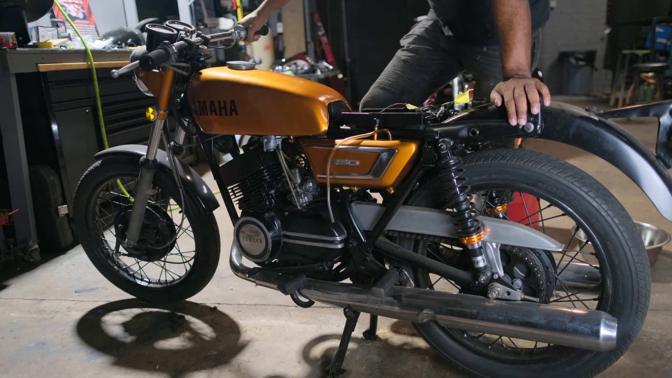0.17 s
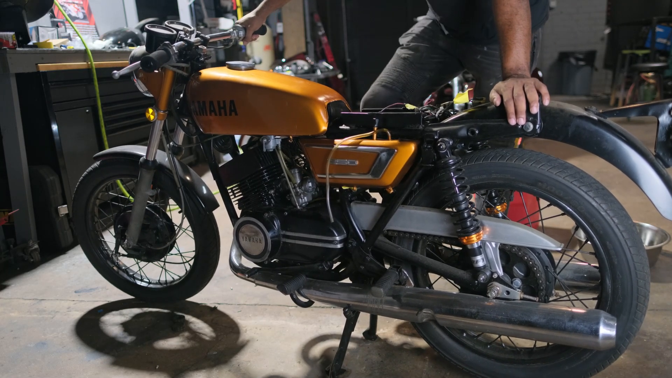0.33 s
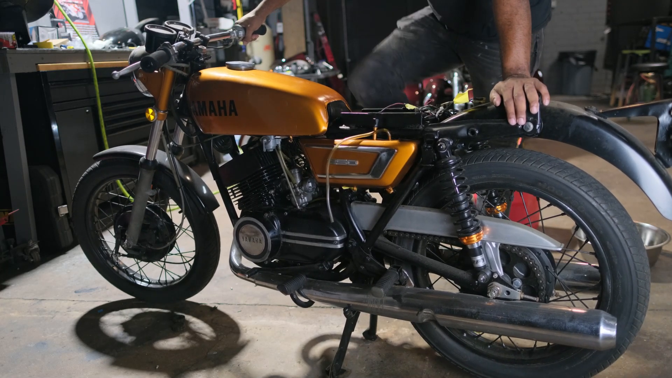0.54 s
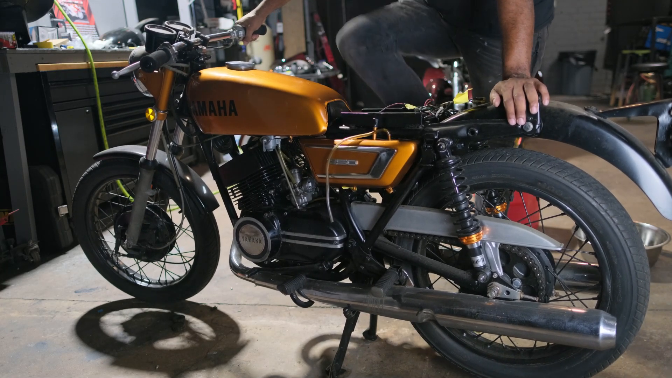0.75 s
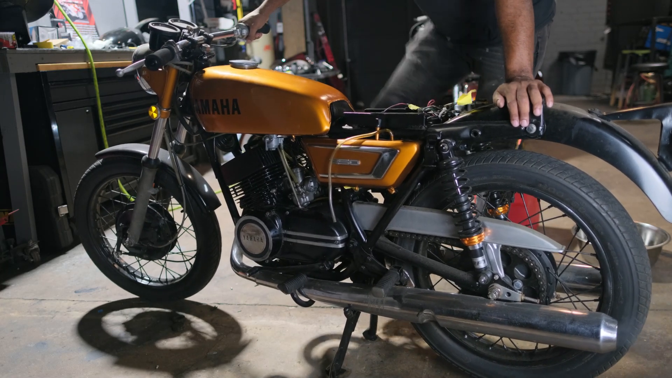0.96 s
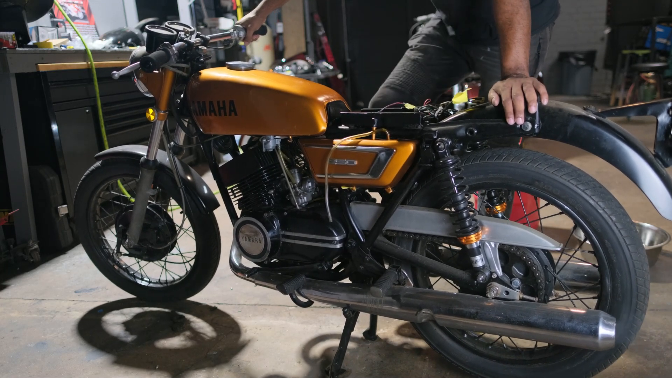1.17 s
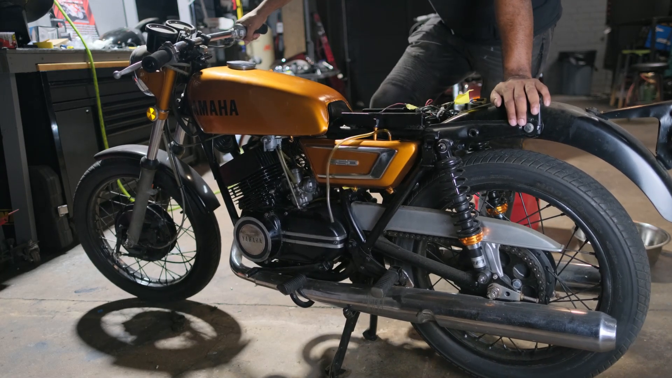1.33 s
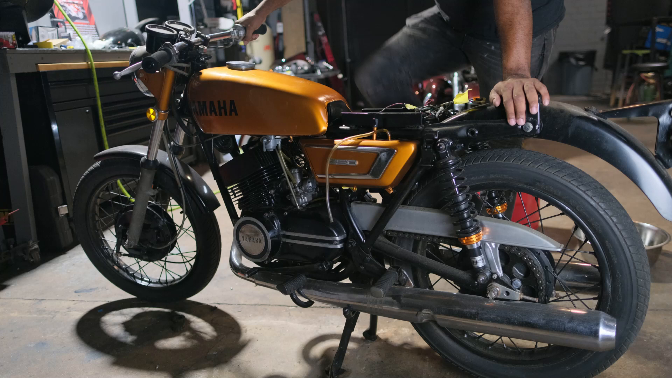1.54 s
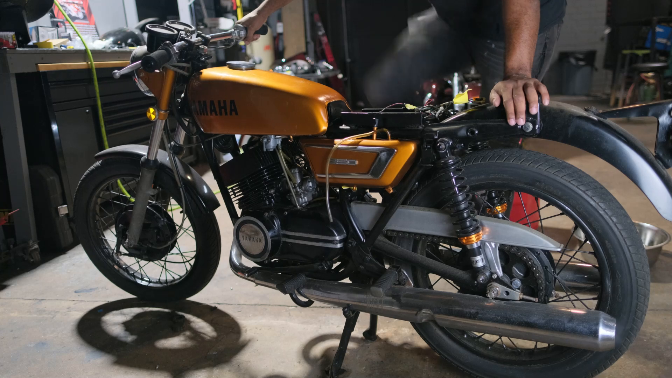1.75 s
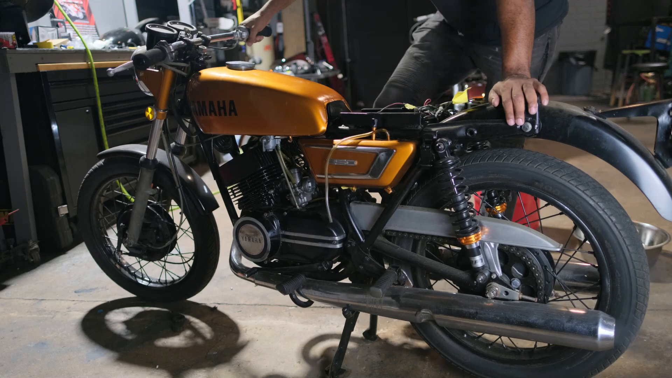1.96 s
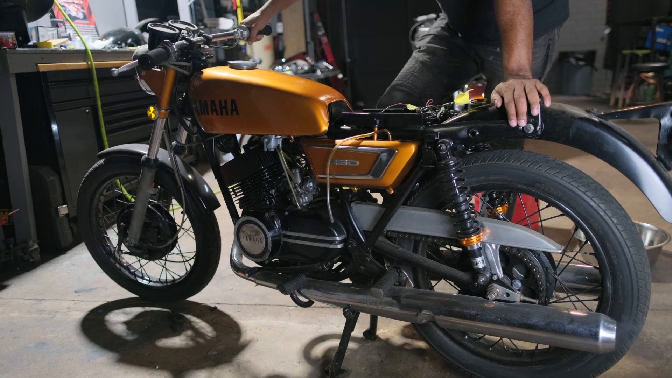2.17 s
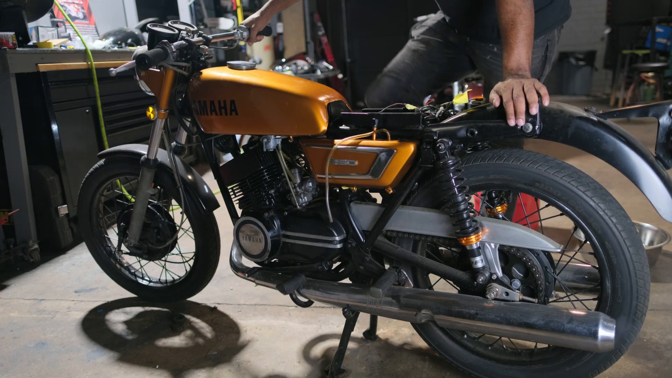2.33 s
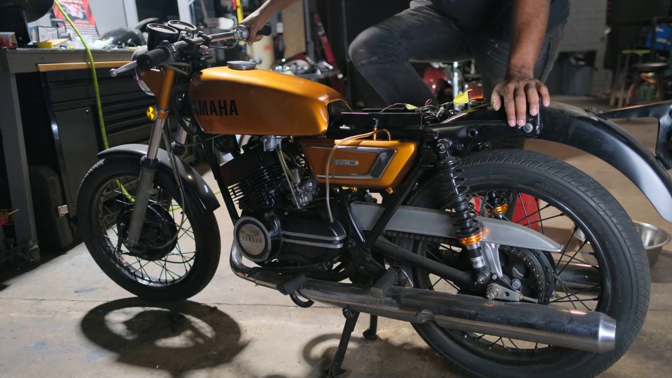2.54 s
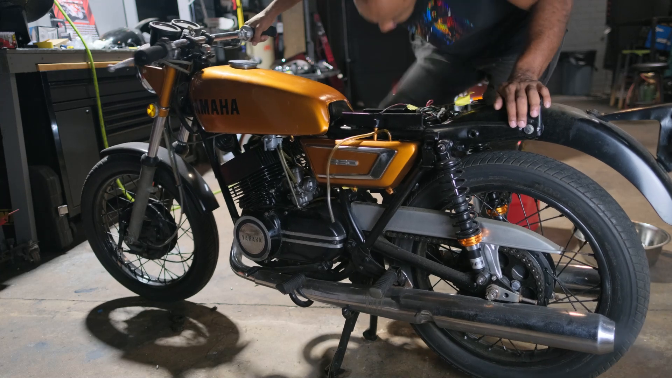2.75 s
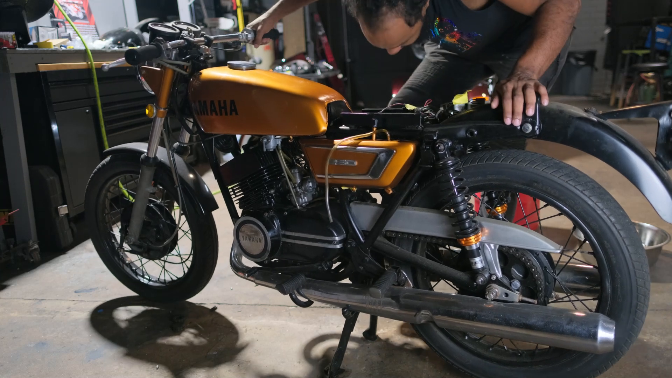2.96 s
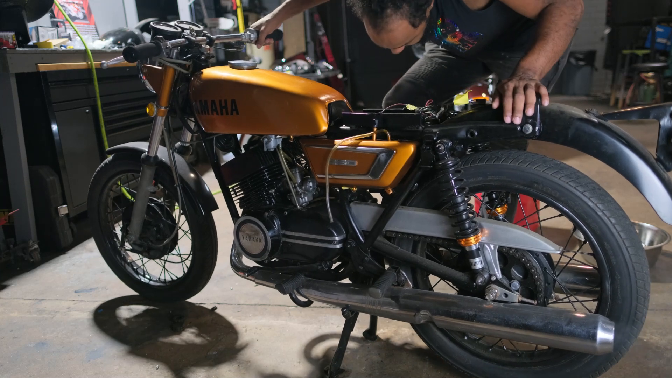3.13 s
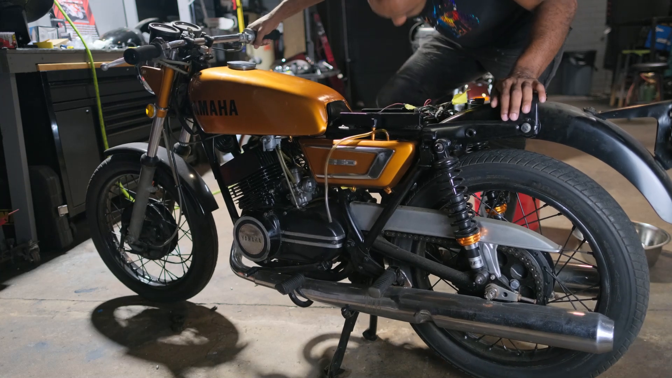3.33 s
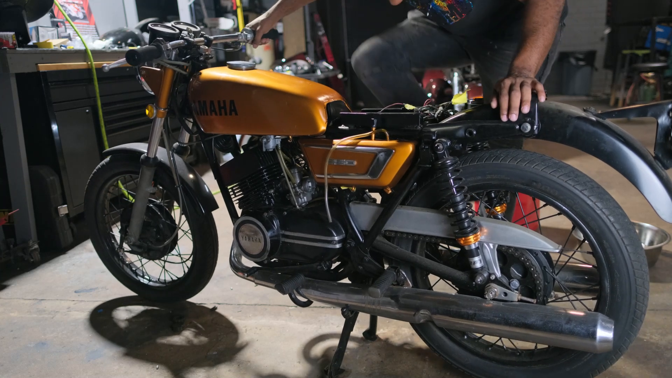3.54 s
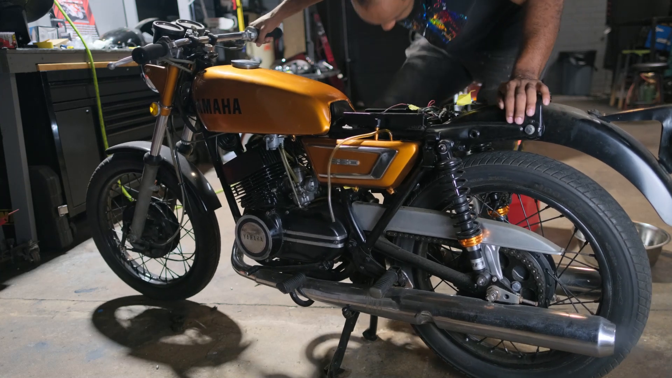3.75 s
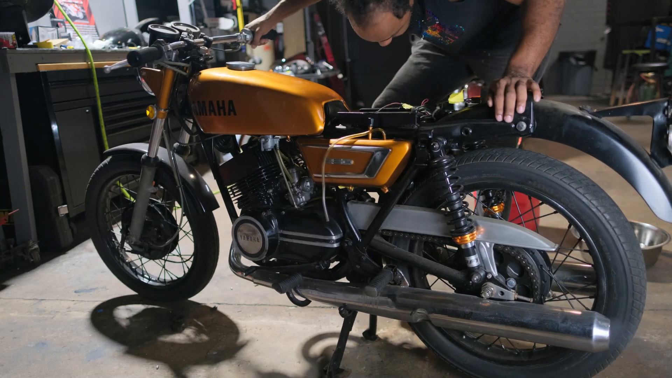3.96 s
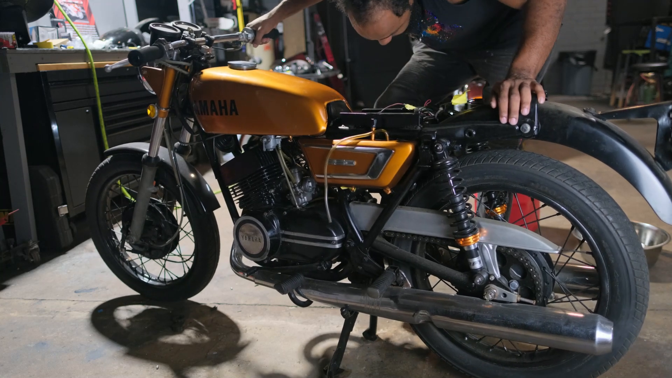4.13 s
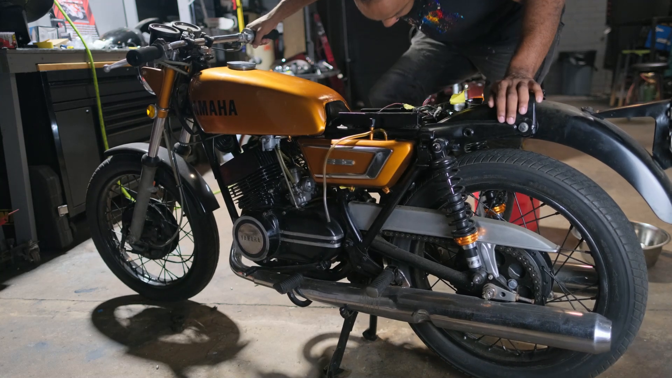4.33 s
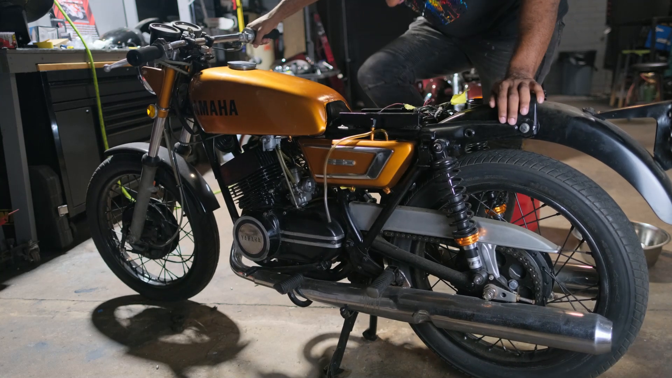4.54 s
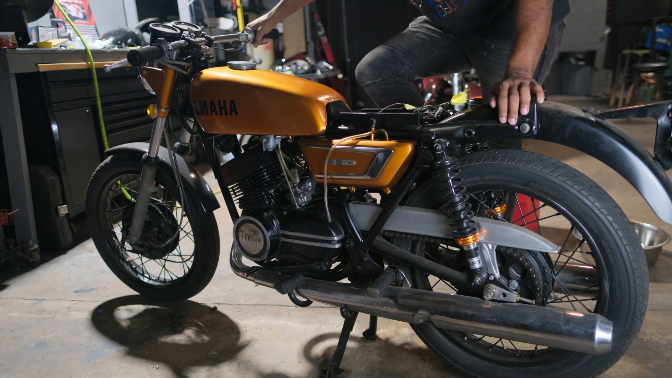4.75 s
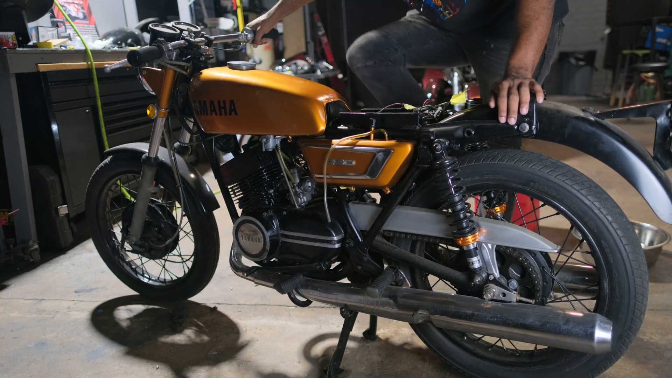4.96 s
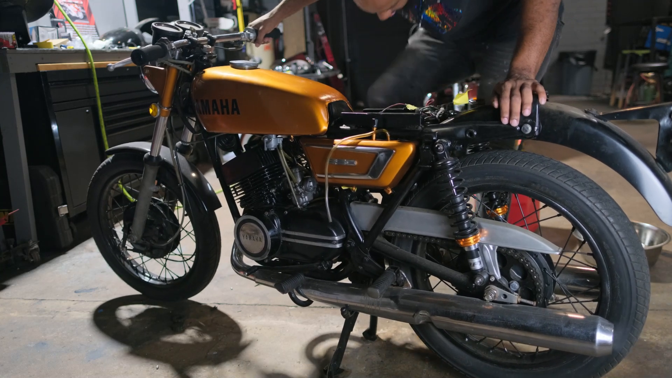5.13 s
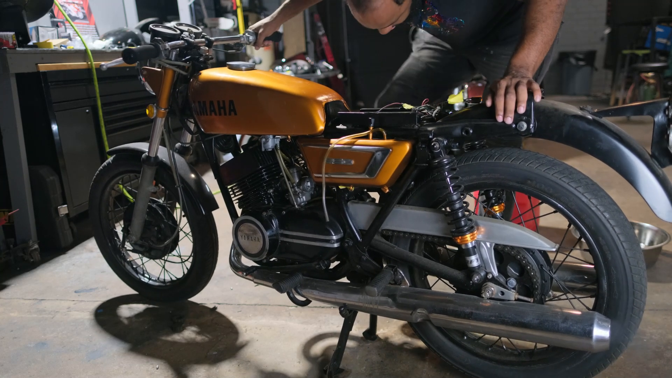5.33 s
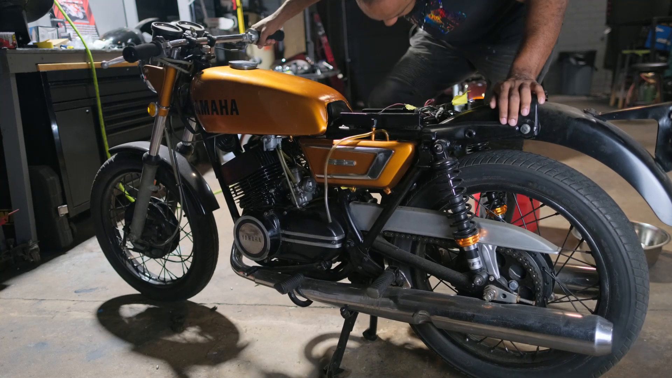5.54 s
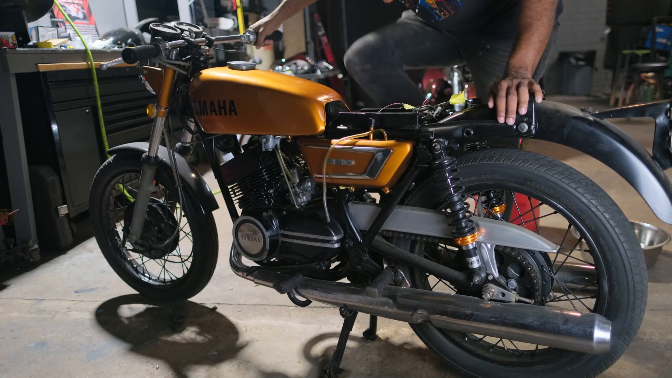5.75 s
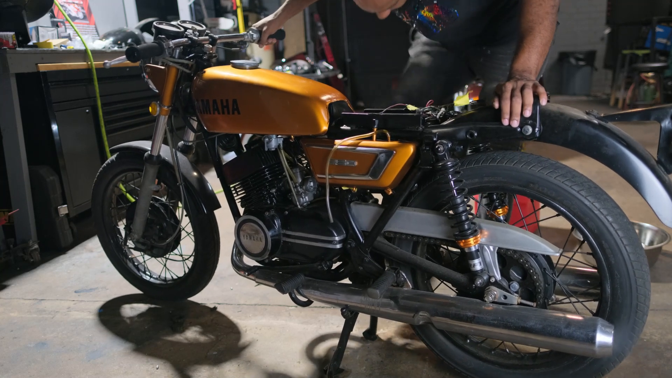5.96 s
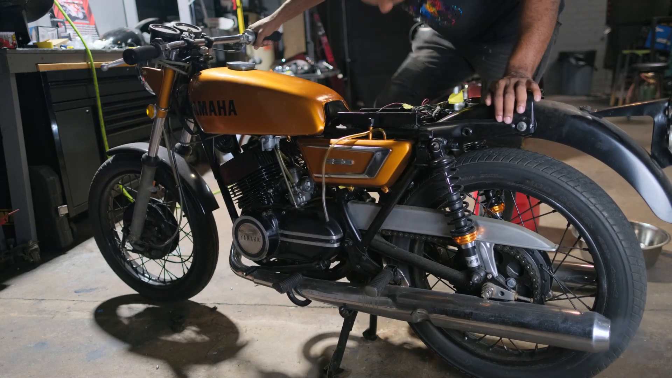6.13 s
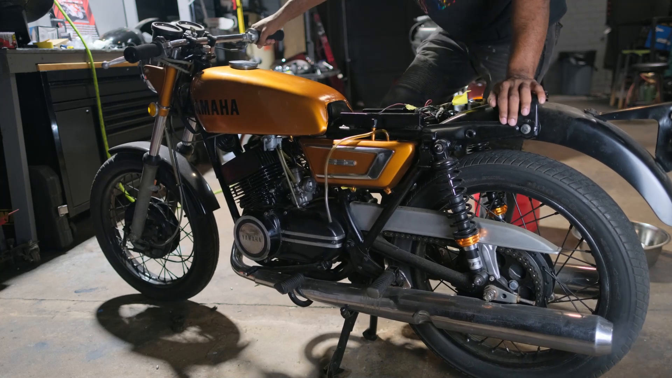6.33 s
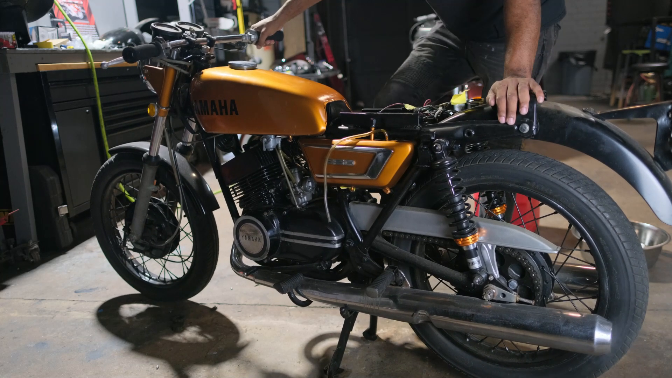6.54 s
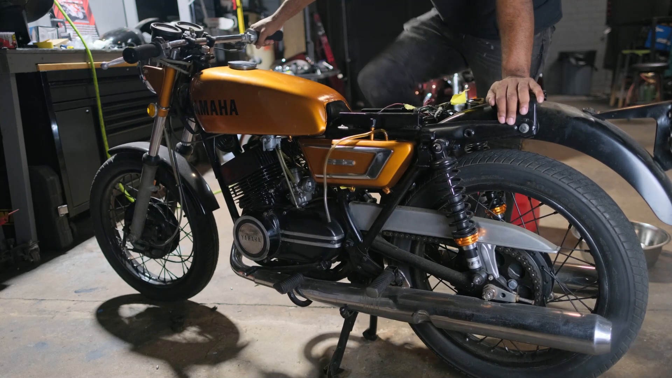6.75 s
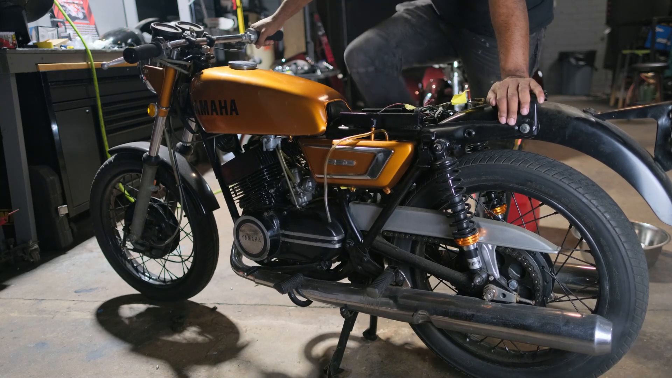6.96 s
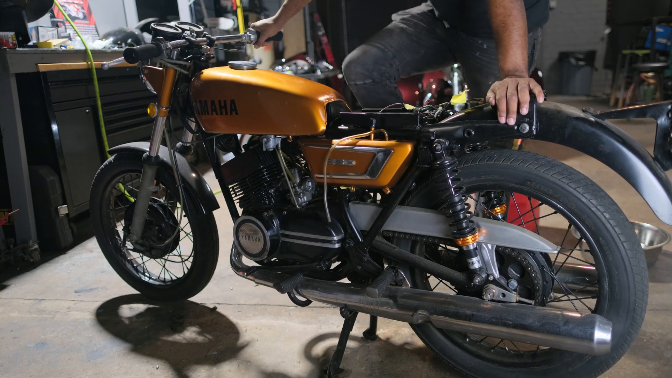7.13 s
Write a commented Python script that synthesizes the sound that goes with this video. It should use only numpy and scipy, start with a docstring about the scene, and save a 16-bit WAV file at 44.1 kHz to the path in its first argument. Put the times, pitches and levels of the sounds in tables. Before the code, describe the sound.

Seven failed kick-starts of a motorcycle in a garage, each a sharp clunk and a churning, rattling spin that dies away.

```python
"""A two-stroke twin is kicked over seven times in a garage and never fires.
The first kick is under way: gears churn, pistons chuff, loose parts rattle and the exhaust booms,
then the engine coasts to rest. Each later kick opens with ratchet clicks and a take-up clunk.
The lever knocks at the bottom of the fourth kick and squeaks faintly before and after the fifth.
Last, it bangs against its stop and the garage rings."""
import sys
import numpy as np
from scipy import signal
from scipy.fft import rfft, irfft, next_fast_len
from scipy.io import wavfile
from scipy.ndimage import uniform_filter1d

SR = 44100
rng = np.random.default_rng(int(sys.argv[2]) if len(sys.argv) > 2 else 0)


def wav_out(sig):
    """Save sig, one row per channel (or a flat mono array), as 16-bit PCM at SR to the path in sys.argv[1]."""
    wavfile.write(sys.argv[1], SR, np.round(np.clip(np.atleast_2d(sig).T, -1, 1) * 32767).astype(np.int16))


N = 317107
T = np.arange(N) / SR

# kicks: take-up t/s, clunk/dB, push length/s, churn/dB, boom/dB, coasting fade/(dB/s)
KICKS = [(-0.1, -8, 0.25, -23.5, -14, 80), (0.81, -8.5, .25, -23, -14.5, 72),
         (1.759, -8.5, 0.33, -27, -21.5, 64), (2.621, -8, 0.38, -23.5, -17, 135),
         (3.678, -7, 0.28, -25, -16.5, 76), (5.088, -7.5, 0.3, -23, -15, 65),
         (5.875, -7, .26, -24.5, -17, 87)]


def amp(db):
    """Decibels to gain."""
    return 10 ** (np.asarray(db) / 20)


def unit(x):
    """Scales to rms 1."""
    return x / np.sqrt(np.mean(x ** 2) + 1e-20)


def read(points, hz):
    """Reads a table on a log-frequency axis."""
    f, value = np.transpose(points)
    return np.interp(np.log(hz + 1), np.log(f), value)


def add(mix, s, sound):
    """Mixes a sound in at time s."""
    start = round(s * SR)
    sound = sound[max(-start, 0):]
    part = mix[max(start, 0):][:len(sound)]
    part += sound[:len(part)]


def colour(x, spectrum):
    """Filters x by a spectrum, to rms 1."""
    size = next_fast_len(len(x))
    gain = amp(read(spectrum, np.fft.rfftfreq(size, 1 / SR)))
    return unit(irfft(rfft(x, size) * gain, size)[:len(x)])


def wander(depth_db):
    """Gain drifting some tens of times a second."""
    return amp(depth_db * colour(rng.standard_normal(N), [(30, 0), (90, -60)]).clip(-2, 2))


def swells(rows, rise_s, fall_s):
    """A rounded bump of gain just after each row (t/s, level/dB)."""
    gain, t = np.zeros(N), np.arange(-SR // 20, SR // 5) / SR
    shape = np.where(t < 0, np.exp(-(t / rise_s) ** 2), np.exp(-(abs(t) / fall_s) ** 1.5))
    for s, db in rows:
        add(gain, s + 0.0032 + t[0], amp(db) * shape)
    return gain


def grit(per_s, spread_db, smooth):
    """Tiny metal contacts of uneven size over a smooth rush."""
    hits = rng.random(N) < per_s / SR
    sizes = amp(spread_db * np.minimum(rng.exponential(1, N), 4))
    return unit(hits * sizes * rng.choice([-1, 1], N)) + smooth * rng.standard_normal(N)


def jingle(x, ring_s, count):
    """Thin steel parts take turns to ring, each briefly at its own pitches."""
    t, hop = np.arange(SR // 20) / SR, 1000
    turns = rng.standard_normal((count, N // hop + 2))
    out = np.zeros(N)
    for turn in turns:
        share = np.interp(np.arange(N) / hop, np.arange(len(turn)), turn == turns.max(0))
        part = unit(rng.standard_normal(len(t)) * np.exp(-t / ring_s))
        out += signal.oaconvolve(x * np.sqrt(share), part)[:N]
    return out


def metal(x, quality, boost_db):
    """The engine's castings favour their own narrow resonances."""
    modes_hz = [432, 615, 758, 1040, 1620, 2208, 2448, 2839, 3010, 3207, 3952]  # casting resonances: f/Hz
    rings = sum(signal.lfilter(*signal.iirpeak(hz, quality, fs=SR), x) for hz in modes_hz)
    return x + amp(boost_db) * rings


def turning():
    """Churn and boom gains: each kick spins up, weakens along the lever's travel, then coasts."""
    spin_up_s, sag_db_per_s, gear_rise_db, boom_rise_db = 0.086, 14.5, 6.5, 12.5
    gains = np.zeros((2, N))
    for start, _, push_s, gear_db, boom_db, fade_db_per_s in KICKS:
        t = T - start
        slack = np.clip(1 - t / spin_up_s, 0, 1)
        sag_db = sag_db_per_s * np.clip(t - spin_up_s, 0, push_s - spin_up_s)
        loss_db = sag_db + fade_db_per_s * np.maximum(t - push_s, 0)
        gains[0] += (t > 0) * amp(gear_db - gear_rise_db * slack - loss_db)
        gains[1] += (t > 0) * amp(boom_db - boom_rise_db * slack - 1.03 * loss_db)
    return uniform_filter1d(gains, size=300, axis=1)


def spent_db(age_s, hold_s=0.42, db_per_s=86):
    """Level falls as the flywheel runs out of momentum."""
    return -db_per_s * np.maximum(age_s - hold_s, 0)


def gears(churn, pump):
    """Meshing teeth churn, loaded by each stroke."""
    spectrum = [(70, -10.5), (200, 3), (310, -4.5), (600, -2.5), (1150, -10), (3300, -17), (4800, -29.5),
                (15500, -43)]  # gear noise: f/Hz, level/dB
    mesh = jingle(grit(per_s=830, spread_db=1.5, smooth=0.65), ring_s=0.002, count=6)
    churning = churn * (1 + 0.23 * pump) * wander(depth_db=1.5) * colour(mesh, spectrum)
    return metal(churning, quality=50, boost_db=-5.5)


def exhaust(boom, pump):
    """Pumped air keeps each pipe resonance sounding, with wandering phase and strength."""
    pipes = [(88, 10.5, -2), (103, 10, -2.5), (142.3, 8.6, -6.5), (191, 40, -13.5)]  # pipe resonances: f/Hz, width/Hz, level/dB
    size = next_fast_len(N)
    hz, drone = np.fft.fftfreq(size, 1 / SR), np.zeros(N)
    for centre_hz, width_hz, db in pipes:
        air = rng.standard_normal(size) + 1j * rng.standard_normal(size)
        ring = np.fft.ifft(air / (1 + ((hz - centre_hz) / width_hz) ** 2))[:N]
        drone += amp(db) * unit(ring.real / abs(ring) ** 0.7)  # flattens the envelope
    return boom * (1 + 0.68 * pump) * unit(drone)


def piston_strokes():
    """Rows (t/s, level/dB): strokes come evenly under the foot and spread out while coasting."""
    runs = [(0.009, 0.439, 6, 0.21, -25.5), (0.879, 1.372, 7, 0.13, -22), (1.834, 2.292, 6, 0.1, -23.5),
            (2.707, 3.014, 5, .07, -22.5), (3.738, 4.211, 6, 0.11, -23.5), (5.139, 5.572, 7, 0.19, -22),
            (5.995, 6.337, 5, 0.1, -24)]  # per kick: first t/s, last t/s, stroke count, slowing 0-1, level/dB
    rows, first_stroke_db = [], -5
    for (start, *_), (first, last, count, slowing, db) in zip(KICKS, runs):
        turn = np.linspace(0, 1, count)
        s = first + (last - first) * ((1 - slowing) * turn + slowing * turn ** 4)
        rows += zip(s, db + first_stroke_db * (turn == 0) + spent_db(s - start))
    return rows


def chuffs(strokes):
    """Each piston stroke pushes a gasp of air."""
    spectrum = [(600, -7), (1200, -34), (1650, 3.5), (2900, 1), (3700, -4), (4600, -16), (15000, -33)]  # air noise: f/Hz, level/dB
    gasps = jingle(grit(per_s=1400, spread_db=1.5, smooth=0.77), ring_s=0.0026, count=6)
    puffs = swells(strokes, rise_s=0.0092, fall_s=0.041) * colour(gasps, spectrum)
    return metal(puffs, quality=60, boost_db=-8)


def rattles(churn):
    """Loose steel parts: single bright bursts, and small uneven shakes through every kick."""
    bursts = [(0.0767, -30.5), (0.1146, -22.5), (0.2024, -26), (1.0725, -26), (1.1538, -30), (1.9954, -28),
              (2.0667, -20), (2.9038, -33), (2.9881, -33.5), (3.983, -18), (4.388, -48), (5.3018, -29),
              (5.4595, -17), (6.134, -22), (6.66, -52), (6.755, -50), (6.965, -52)]  # single rattles: t/s, level/dB
    spectrum = [(3000, -8), (6200, -8.5), (6850, 3.5), (7900, -1.5), (8800, -7), (11600, -8.5),
                (12800, -17.5), (15500, -17.5)]  # loose steel: f/Hz, level/dB
    shakes, count, gap_s, jitter_s = [], 12, 0.047, 0.0095
    for start, *_ in KICKS:
        offset, strength = rng.standard_normal((2, count))
        age_s = gap_s * np.arange(1, count + 1) + jitter_s * offset
        shakes += zip(start + age_s, -29 + 2.5 * strength + spent_db(age_s))
    shaking = swells(bursts + shakes, rise_s=0.0022, fall_s=0.016)
    shaking += amp(-11) * churn * wander(depth_db=5.5)
    steel = jingle(grit(per_s=580, spread_db=3.5, smooth=1.0), ring_s=0.0021, count=8)
    return shaking * colour(steel, spectrum)


def engine():
    """The unfired engine turns; each stroke loads the gears and pumps air down the pipes."""
    churn, boom = turning()
    strokes = piston_strokes()
    pump = swells([(s, 0) for s, _ in strokes], rise_s=0.0045, fall_s=0.014)
    casing = amp(-1) * gears(churn, pump) + amp(-8) * chuffs(strokes)
    return casing + amp(-12) * rattles(churn) + amp(-2.5) * exhaust(boom, pump)


def burst(spectrum, rise_s, fall_s):
    """Milliseconds of chatter as two parts meet."""
    t = np.arange(4096) / SR
    shape = (1 - np.exp(-(t / rise_s) ** 2)) * np.exp(-(t / fall_s) ** 2)
    bins = rfft(rng.standard_normal(len(t)) * shape)
    whitened = irfft(bins / abs(bins))
    chatter = colour(whitened, spectrum) * np.sqrt(shape)
    return chatter * np.linalg.norm(shape) / np.linalg.norm(chatter) / shape.max()


def ringing(modes, rise_s):
    """Modes of a struck part, swelling while the contact lasts."""
    t = np.arange(SR // 8) / SR
    ring = sum(amp(db - 60 * t / t60_s) * np.sin(2 * np.pi * (hz * t + rng.random()))
               for hz, db, t60_s in modes)
    return ring * (1 - np.exp(-(t / rise_s) ** 2))


def ratchet_teeth(count=3, clack_step_db=9.5, tick_step_db=15):
    """Rows (t/s, clack/dB, tick/dB): teeth snap in ever harder and brighter before each take-up."""
    engages = [(.012, .019, -10, -35), (.0215, 0.009, -20, -53), (0.0097, 0.019, -10, -30),
               (0.01, .017, -10, -29.5), (0.012, .019, -4, -37), (.0195, .0228, -14.5, -44),
               (0.016, 0.023, -8.5, -37)]  # last tooth per kick: lead/s, tooth gap/s, clack/dB, tick/dB
    return [(start - lead_s - k * gap_s, clack_db - k * clack_step_db, tick_db - k * tick_step_db)
            for (start, *_), (lead_s, gap_s, clack_db, tick_db) in zip(KICKS, engages)
            for k in range(count)]


def starter():
    """The ratchet clacks and the kick gear clunks; harder blows crack more brightly."""
    jolts = [(0.783, -31, -40, -62), (1.693, -34, -50, -67), (1.749, -11, -30, -46), (1.7588, -34, 2, -56),
             (1.9117, -39, -1, -30), (2.7544, -16, 3, -24), (6.829, -34.5, -52, -60),
             (6.8378, -33, -40, -40)]  # gear jolts in its slack or slips a tooth: t/s, clunk/dB, clack/dB, tick/dB
    case_modes = [(625, -9.5, 0.058), (1015, -9.5, 0.085), (1150, 6.5, 0.027), (1337, -16.5, 0.042),
                  (1610, -29, 0.028), (4054, -25, 0.025)]  # crankcase and lever: f/Hz, level/dB, t60/s
    pawl_modes = [(3930, -25.5, 0.051), (4430, -31.5, .05)]  # steel pawl: f/Hz, level/dB, t60/s
    crack = [(100, -0.5), (320, -4.5), (600, -5), (1500, -4.5), (2400, -12), (3900, -12), (4800, -24.5),
             (15000, -43.5)]  # gear blow: f/Hz, level/dB
    clack = [(700, -5.5), (2300, -3), (3100, -6), (3950, -4), (4800, -20), (9000, -46.5)]  # tooth blow: f/Hz, level/dB
    tick = [(1000, 4), (6000, 4), (15500, -8.5)]  # its bright edge: f/Hz, level/dB
    contact_s = 0.0018
    rings, cracks = np.zeros((2, N))
    for s, db, *_ in KICKS + jolts:
        add(rings, s, amp(db - 4) * ringing(case_modes, rise_s=contact_s))
        add(cracks, s, amp(1.146 * db - 3.5) * burst(crack, rise_s=contact_s, fall_s=0.01))
    for s, *_, clack_db, tick_db in ratchet_teeth() + jolts:
        add(cracks, s, amp(clack_db - 20.5) * burst(clack, rise_s=contact_s, fall_s=0.012))
        add(rings, s, amp(clack_db) * ringing(pawl_modes, rise_s=contact_s))
        add(cracks, s, amp(tick_db - 0.5) * burst(tick, rise_s=0.0034, fall_s=0.012))
    return rings + metal(cracks, quality=140, boost_db=-4)


def lever_blows():
    """The lever bottoms out dully once; at the end it flies back and bangs on its stop."""
    bottom_modes = [(1002, 1, 0.048), (1150, -8, .03)]  # lever bottomed out: f/Hz, level/dB, t60/s
    thud = [(400, -6.5), (750, -4), (1450, -4.5), (2200, -10), (8000, -37)]  # bottoming blow: f/Hz, level/dB
    stop_modes = [(1093, 0, 0.023), (1556, -2, 0.028), (1660, 4, 0.02), (2540, -11, .025),
                  (3720, -12, 0.038), (5780, -17, 0.024)]  # lever on its stop: f/Hz, level/dB, t60/s
    bang = [(250, -11), (700, -6), (1750, 4.5), (2400, -5), (3050, -15.5), (3750, -8), (4700, -25),
            (7500, -27.5), (15000, -38)]  # blow on the stop: f/Hz, level/dB
    bottom_s, stop_s = 3.0, 6.9012
    ring, clatter = np.zeros((2, N))
    add(ring, bottom_s, amp(-10.5) * ringing(bottom_modes, rise_s=0.0017))
    add(clatter, bottom_s, amp(-19.5) * burst(thud, rise_s=0.006, fall_s=0.006))
    add(ring, stop_s, amp(-1) * ringing(stop_modes, rise_s=0.0023))
    add(clatter, stop_s, amp(-9) * burst(bang, rise_s=0.0034, fall_s=0.0043))
    return ring, clatter


def squeaks():
    """The lever's dry pivot rubs in one narrow band."""
    rubs = [(3.568, -56), (4.617, -56.5), (4.9, -62.5)]  # squeaks between kicks: t/s, level/dB
    friction = unit(signal.lfilter(*signal.iirpeak(3450, Q=7, fs=SR), rng.standard_normal(N)))
    return swells(rubs, rise_s=0.0028, fall_s=0.034) * friction


def garage(x):
    """Dense reflections from hard walls; the low mids ring longest."""
    decay = [(90, 1.1), (300, 1.52), (800, 1.28), (2000, 1), (4000, 1.16), (8000, 0.65), (15000, 0.22)]  # reverberation: f/Hz, t60/s
    size, taps_per_s, delay_samples = 3 * SR // 2, 4000, 300
    taps = rng.choice([-1., 1.], size) * (rng.random(size) < taps_per_s / SR)
    taps *= np.arange(size) > delay_samples
    hz, t, bins = signal.stft(taps, SR, nperseg=256)
    fade = amp(-60 * t / read(decay, hz)[:, None])
    tail = signal.istft(bins * fade, SR, nperseg=256)[1]
    return signal.fftconvolve(x, tail / np.linalg.norm(tail))[:N]


def scene():
    """The motorcycle close by, the garage behind it, and low steady room noise."""
    room_spectrum = [(30, -1.5), (90, 9.5), (180, -5), (237, 6.5), (310, -11.5), (900, -16.5), (3600, -30),
                     (5500, -37), (15500, -37.5)]  # room noise: f/Hz, level/dB
    motor = engine()
    kick_gear = starter() + squeaks()
    ring, clatter = lever_blows()
    echo = garage(amp(-11.5) * motor + amp(-9) * kick_gear + amp(-4.5) * clatter)
    ambience = amp(-48.5) * colour(rng.standard_normal(N), room_spectrum)
    return (motor + kick_gear + ring + clatter + echo + ambience)[None]


def record(dry):
    """Microphone low cut, full-scale clipping, band limit."""
    low_cut_hz, edge_hz = 48, 16200
    thinned = signal.sosfilt(signal.butter(2, low_cut_hz, "highpass", fs=SR, output="sos"), dry)
    lowpass = signal.firwin(511, edge_hz, window=("kaiser", 9), fs=SR)
    return signal.oaconvolve(np.clip(thinned, -1, 1), lowpass[None], "same")


dry = scene()
out = record(dry)
wav_out(out)
```